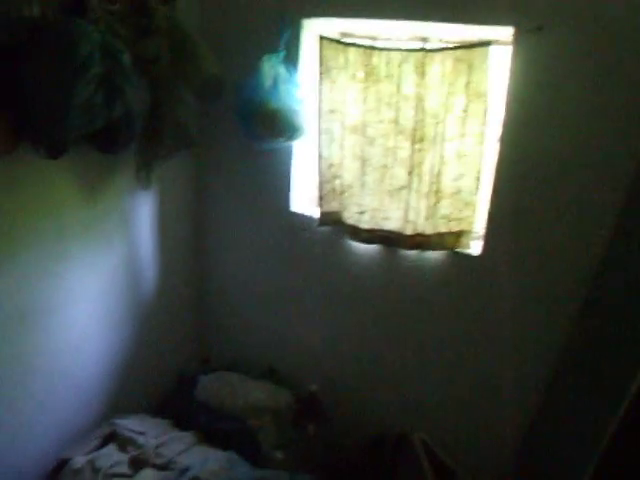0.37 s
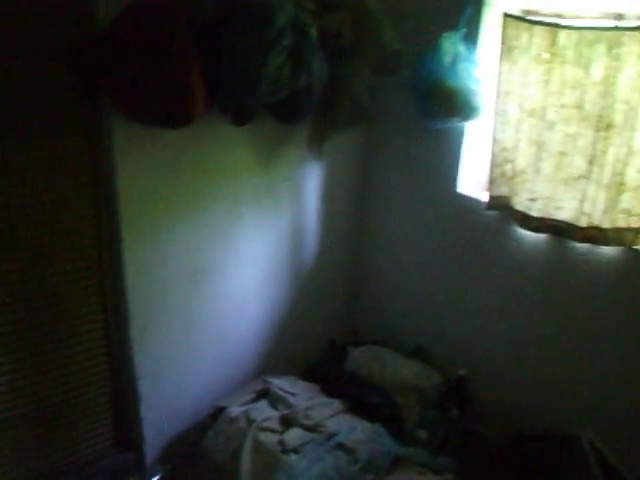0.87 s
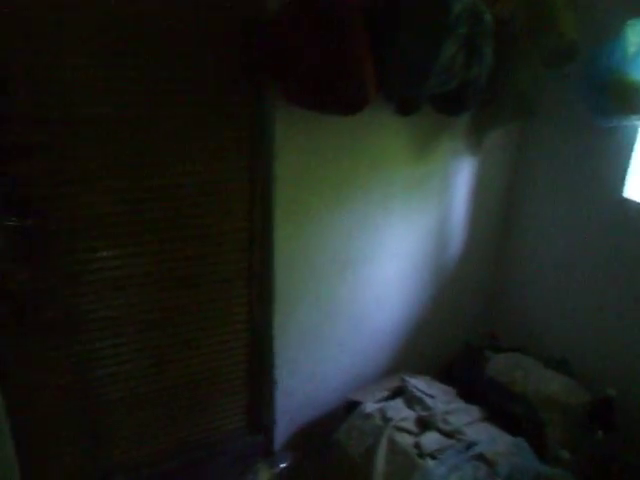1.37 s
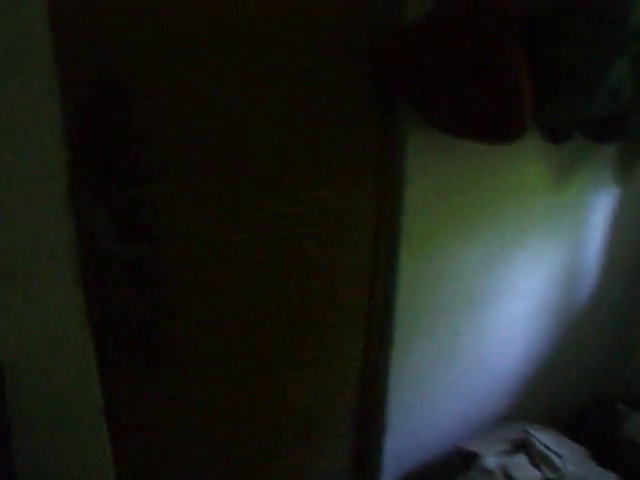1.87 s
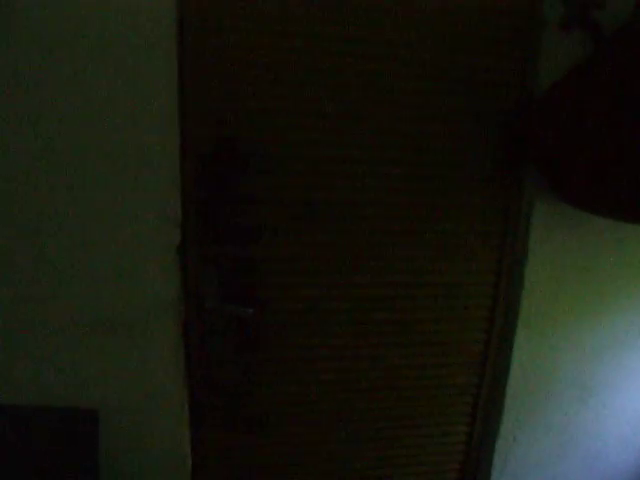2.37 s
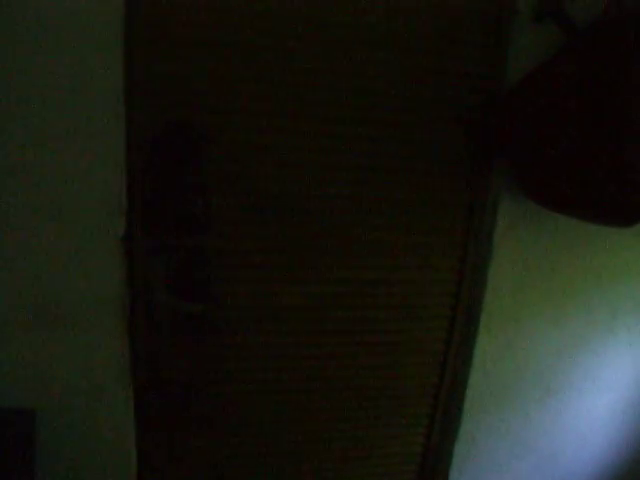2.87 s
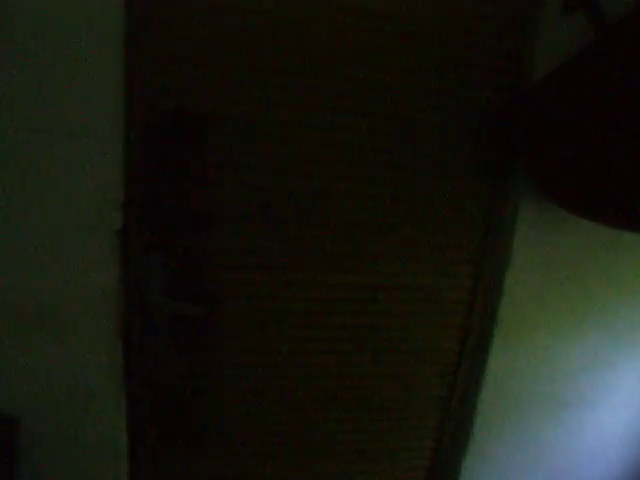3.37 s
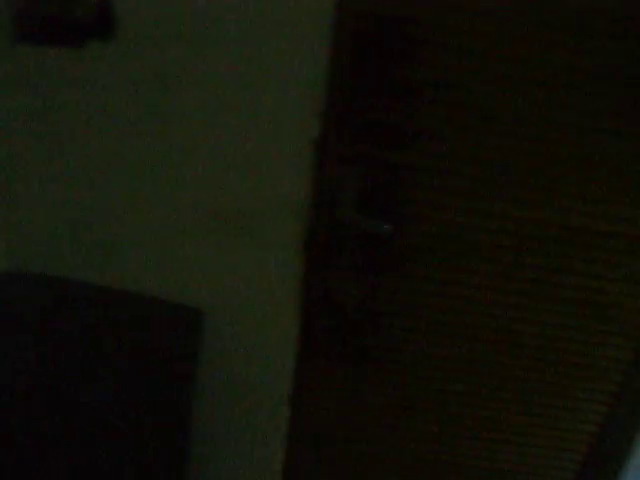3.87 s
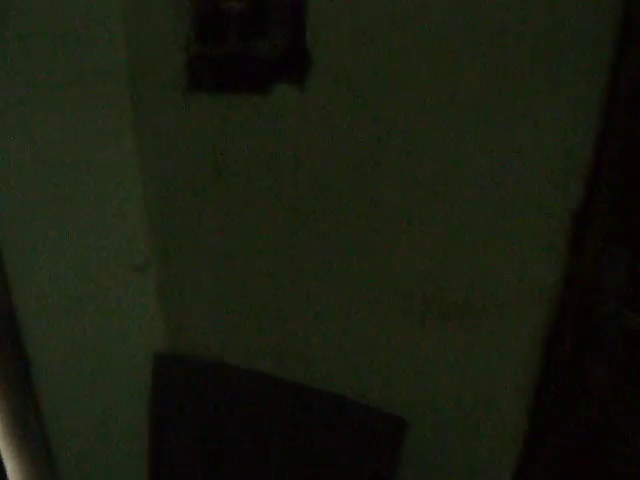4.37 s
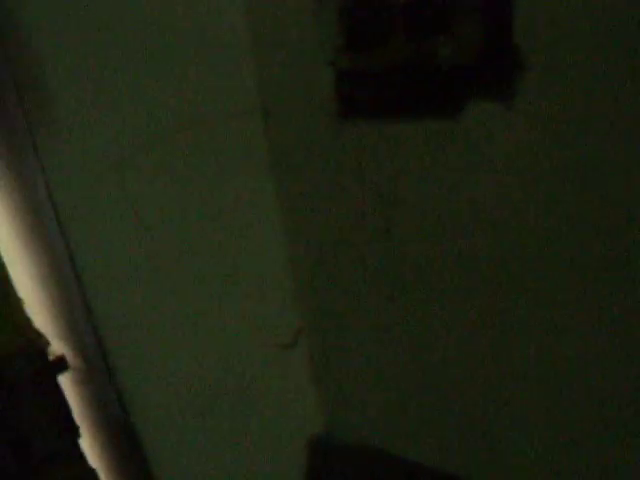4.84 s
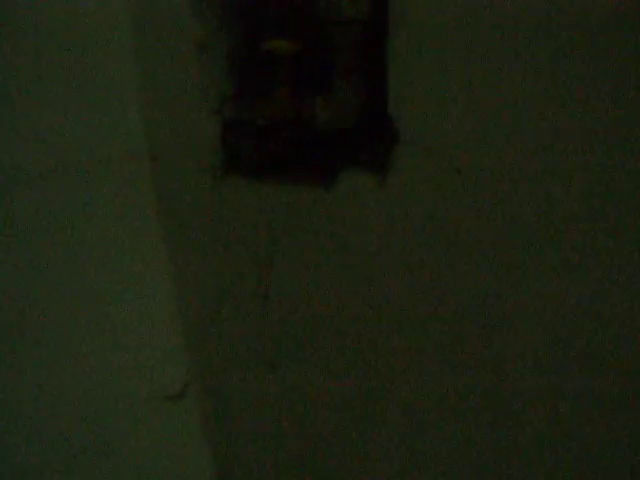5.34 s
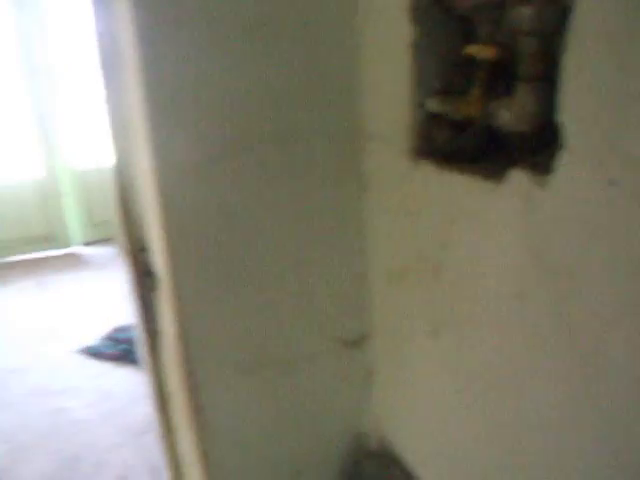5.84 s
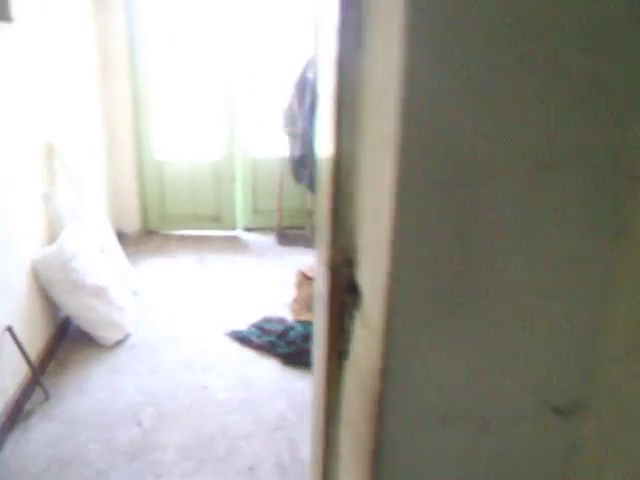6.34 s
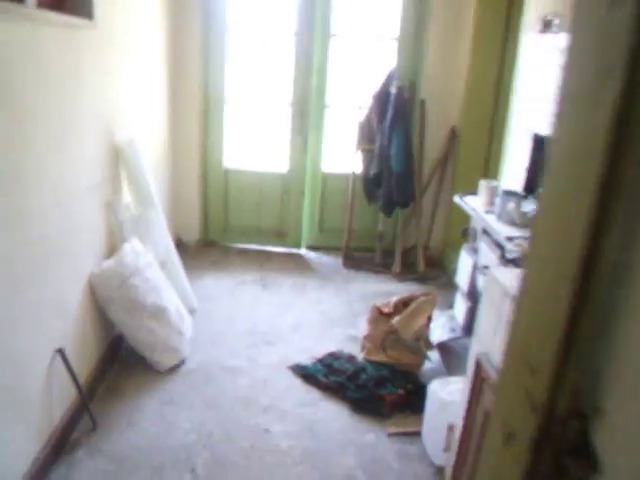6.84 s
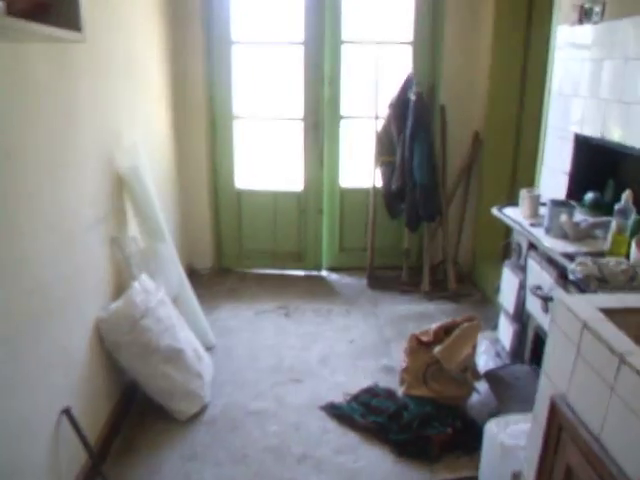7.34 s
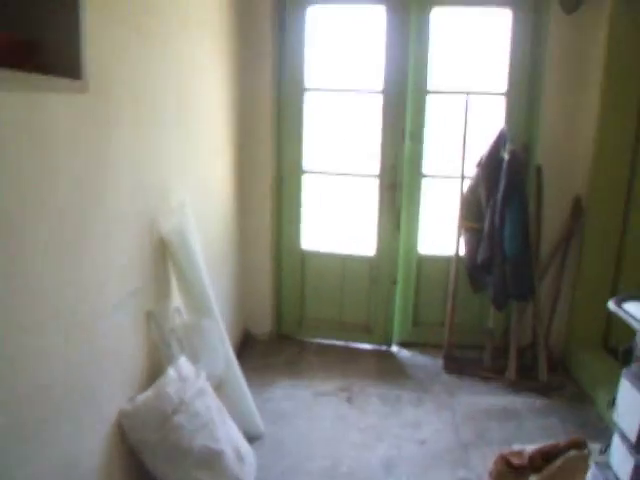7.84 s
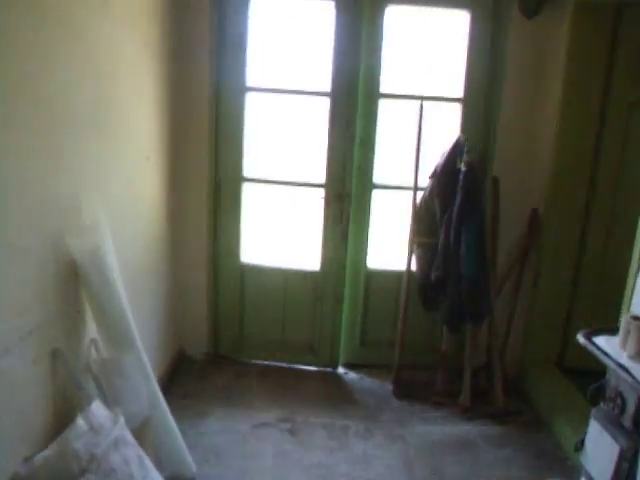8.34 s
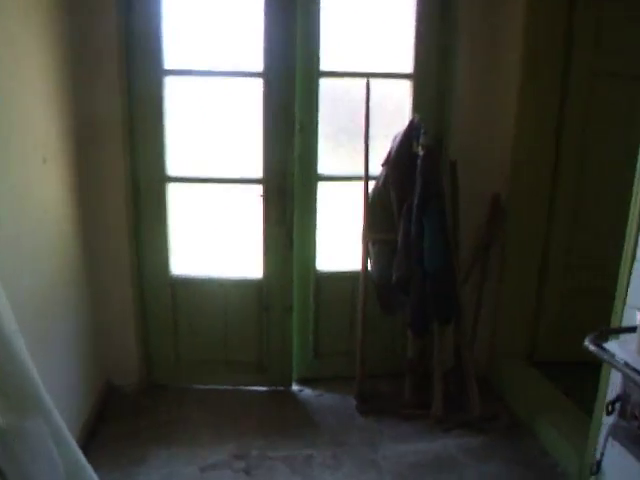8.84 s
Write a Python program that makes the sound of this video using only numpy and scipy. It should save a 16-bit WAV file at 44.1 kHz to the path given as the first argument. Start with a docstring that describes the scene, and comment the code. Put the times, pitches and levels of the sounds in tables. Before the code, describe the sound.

Plastic rubbing and a distant door bang, then a wooden door slams, booms and rattles shut, followed by sharp clicks and shoe scuffs over gritty hiss.

```python
"""Someone carries a small camera through a bare old house. At first fingers rub its plastic case and a door
hums low; a far door bangs, the case squeaks, and the iris drive starts to tick in step with the frames.
Past three seconds a wooden door slams, booms, shudders and is dragged shut, and fingers click on the case.
Shoes knock and scuff on a hard floor to the end. Rough contacts are shaped noise, clicks and slams ring as
sines, knocks are bursts of fading noise; a coarse 8-bit converter turns the quiet into a two-level hiss."""
import sys
import numpy as np
from scipy import signal
from scipy.fft import rfft, irfft
from scipy.io import wavfile

SR = 44100
rng = np.random.default_rng(int(sys.argv[2]) if len(sys.argv) > 2 else 0)


def output_pcm(signal):
    """Save a mono or channel-first signal as 16-bit PCM at the path in sys.argv[1].

    Samples are clipped to [-1, 1] before scaling.
    """
    pcm = np.clip(np.atleast_2d(signal).T, -1, 1) * 32767
    wavfile.write(sys.argv[1], SR, np.round(pcm).astype(np.int16))


def gain_from_db(level_db):
    """Convert decibel levels to linear amplitude factors (20 dB per decade)."""
    decades = np.asarray(level_db, float) / 20
    return 10 ** decades


N = 406161
RATE = 16000   # samples per second of the converter

# Resonances of the door panel. Each row: pitch in Hz, width in Hz, level in dB.
PANEL = [(138, 16, -2), (185.8, 11, -0.5), (228, 57, -11), (294, 31, -1), (323, 12, 1), (362, 19, -1.5),
         (441.5, 20, -2.5), (513, 13, -7), (582, 27, -9), (637.5, 67, -6), (782, 270, -13)]


def rms_one(x):
    """Scales a sound to an rms level of 1."""
    return x / np.sqrt(np.mean(x ** 2) + 1e-20)


def gain_curve(rows):
    """Turns rows of seconds and dB into a smooth gain, all but silent outside them."""
    s, db = np.transpose(rows)
    return gain_from_db(np.interp(np.arange(N) / SR, s, db, -110, -110))


def strokes(rows, t60s):
    """One gain per level column: every row swells, holds and dies away (60 dB in t60 s); powers add."""
    rise_share = 0.3   # a stroke swells over this share of its length
    t, power = np.arange(N) / SR, 1e-14
    for s, length, *levels_db in rows:
        rise = np.sin(np.pi / 2 * np.clip((t - s) / (rise_share * length), 0, 1)) ** 2
        fall_db = -60 * np.clip(t - s - length, 0, 3) / np.reshape(t60s, (-1, 1))
        power = power + (rise * gain_from_db(np.reshape(levels_db, (-1, 1)) + fall_db)) ** 2
    return np.sqrt(power)


def band(x, low_hz, high_hz):
    """Lets through only the sound between two pitches."""
    return signal.sosfilt(signal.butter(2, [low_hz, high_hz], "band", fs=SR, output="sos"), x)


def waver(low_hz, high_hz, depth_db):
    """A gain that wanders at random, at speeds between two rates."""
    return gain_from_db(depth_db * rms_one(band(rng.standard_normal(N), low_hz, high_hz)))


def grit(spread_db):
    """Dense contacts of uneven size: noise whose samples differ more in level as the spread grows."""
    return rng.standard_normal(N) * gain_from_db(spread_db * np.minimum(rng.exponential(1, N), 5))


def scratch(low_hz, high_hz, spread_db):
    """Grit held to one band; rms 1."""
    return rms_one(band(grit(spread_db), low_hz, high_hz))


def resonate(x, peaks):
    """Sends a sound through parallel resonances with alternating sign; rms 1."""
    out = 0
    for k, (hz, width, db) in enumerate(peaks):
        r = np.exp(-np.pi * width / SR)
        b = (1 - r * r) / 2 * np.array([1, 0, -1])
        a = [1, -2 * r * np.cos(2 * np.pi * hz / SR), r * r]
        out = out + (-1) ** k * gain_from_db(db) * signal.lfilter(b, a, x)
    return rms_one(out)


def ring(clicks, hz, t60):
    """A unit click sets a sine of about height 1 ringing; it falls by 60 dB in t60 seconds."""
    r, w = gain_from_db(-60 / (t60 * SR)), 2 * np.pi * hz / SR
    return signal.lfilter([0, np.sin(w)], [1, -2 * r * np.cos(w), r * r], clicks + 1e-18)


def sine(hz, db):
    """A tone of given rms level along a pitch track."""
    return np.sqrt(2) * gain_from_db(db) * np.sin(2 * np.pi * np.cumsum(hz * np.ones(N)) / SR)


def drag(gains, low, middle_hz, spread_db):
    """Rough sliding contact: high hiss, middle scratch and a low body, each with its own gain."""
    hiss = resonate(grit(spread_db), [(5426, 1800, -3), (6870, 1900, 0.5)])
    return gains[0] * hiss + gains[1] * scratch(*middle_hz, spread_db) + gains[2] * low


def air():
    """Steady air and microphone noise: white noise coloured by a curve and cut at half the converter rate."""
    # Colour of the noise. Each row: pitch in Hz, relative level in dB per Hz.
    colour = [(10, 9.5), (60, 5.5), (250, 6.5), (600, 5), (1500, 1.5), (4000, -1.5), (8000, 0)]
    level_db = -56
    hz, db = np.transpose(colour)
    pitches = np.fft.rfftfreq(N, 1 / SR) + 1
    shape = gain_from_db(np.interp(np.log(pitches), np.log(hz), db)) * (pitches < RATE / 2)
    return gain_from_db(level_db) * rms_one(irfft(rfft(rng.standard_normal(N)) * shape, N))


def iris():
    """Soft steps of the iris drive, a few milliseconds long, ring its modes while the gears chatter."""
    # Bursts of steps. Each row: first step in seconds, number of steps, frames apart, level in dB.
    bursts = [(1.216, 7, 1, -35), (1.482, 2, 3, -38.5), (1.947, 2, 4, -33), (2.181, 2, 4, -32.5),
              (2.414, 6, 3, -34.5), (3.116, 1, 1, -35.5), (5.185, 1, 1, -40), (6.183, 1, 1, -34.5),
              (6.2165, 43, 2, -41), (6.25, 42, 2, -38)]
    # Modes of the drive. Each row: pitch in Hz, level in dB, seconds to fall by 60 dB.
    modes = [(627.7, -5, .025), (4690, -5, .012), (3000, -12.5, 0.007), (6820, -6, 0.0027)]
    frame_hz, spread_db, step_s = 30, 1.4, 0.0054
    chatter_hz = 2500   # above this the gear noise outweighs the step
    times, levels_db = [], []
    for first_s, count, apart, db in bursts:
        for k in range(round(count)):
            times.append(first_s + k * apart / frame_hz)
            levels_db.append(db)
    steps = np.zeros(N)
    at = (np.array(times) * SR).astype(int)
    steps[at] = gain_from_db(np.array(levels_db) + rng.normal(0, spread_db, len(at)))
    swell = signal.windows.hann(int(step_s * SR))
    t = np.arange(len(swell)) / SR
    out = 0
    for hz, mode_db, t60 in modes:
        push = swell * np.sin(2 * np.pi * hz * t)
        drive = np.convolve(steps, push, "same") * 4 / len(swell)
        chatter = 1 + hz / chatter_hz * rng.standard_normal(N)
        out = out + gain_from_db(mode_db) * ring(drive * chatter, hz, t60)
    return out


def shoes():
    """Shoes dragged over grit: noisy strokes of hiss, middle scratch and low scrape."""
    # Each row: start in seconds, length in seconds, hiss in dB, middle in dB, low in dB.
    scuffs = [(1.88, 0.051, -52.5, -52, -57.5), (2.905, 0.025, -37.5, -40.5, -61),
              (2.975, 0.042, -36.5, -40.5, -54.5), (5.5, 0.029, -46, -61, -61.5),
              (5.59, 0.03, -51, -58, -56), (5.69, .05, -48.5, -52.5, -63),
              (5.78, 0.021, -45.5, -52.5, -52.5), (6.37, 0.093, -45, -50.5, -55.5),
              (6.55, 0.025, -53, -56.5, -56), (6.77, 0.049, -49.5, -52.5, -57.5),
              (7.49, 0.037, -52.5, -56, -57.5), (7.57, 0.068, -50, -50, -57.5),
              (7.64, 0.066, -43, -50.5, -55), (7.83, 0.025, -48.5, -51.5, -57.5),
              (8.313, 0.024, -37, -48.5, -50.5), (8.35, 0.018, -37, -45, -53),
              (8.48, 0.15, -52, -56, -58.5), (8.63, .15, -47, -52, -68.5), (8.84, 0.094, -56, -56.5, -54.5),
              (9.072, 0.069, -31.5, -36.5, -36), (9.125, 0.037, -28, -35.5, -36.5)]
    gains = strokes(scuffs, (0.3, 0.37, 0.3))   # seconds to fall by 60 dB: hiss, middle, low
    return drag(gains, scratch(450, 1100, spread_db=-1.5), (1500, 4500), spread_db=3.0)


def knocks(rows, t60, front_db):
    """A sharp front of direct sound, then dense reflections that die away: bass, body and treble."""
    rise_s, front_t60_s = 0.0008, 0.022
    body_span = 1.55   # the body reaches this factor below and above its pitch
    out, echoes = np.zeros(N), grit(2.5)
    low, high = scratch(220, 900, spread_db=0.5), scratch(3200, 10000, spread_db=0.0)
    for s, db, bass_db, treble_db, body_hz in rows:
        part = slice(int(s * SR), int(s * SR) + SR // 2)
        t = np.arange(len(out[part])) / SR
        front = gain_from_db(front_db - 60 * t / front_t60_s)
        fade = (1 - np.exp(-t / rise_s)) * (gain_from_db(-60 * t / t60) + front)
        body = rms_one(band(echoes[part], body_hz / body_span, body_hz * body_span))
        out[part] += fade * (gain_from_db(bass_db) * low[part] + gain_from_db(db) * body + gain_from_db(treble_db) * high[part])
    return band(out, 170, 12000)


def hits():
    """Noise bursts for hard blows: a longer fade for a far bang and room knocks, a short one for dry hits."""
    # Each row of these three: start in seconds, body in dB, bass in dB, treble in dB, body pitch in Hz.
    far_bang = [(0.762, -21, -25.5, -18.5, 2380)]      # a far door bangs
    door_heels = [(1.798, -55.5, -54, -60, 1030), (2.904, -46.5, -53, -43.5, 2500),
                  (3.001, -50.5, -48.5, -43.5, 1380), (3.585, -34, -54, -36.5, 2710),
                  (5.437, -40, -49.5, -54.5, 1150), (5.509, -51, -73, -51, 2430),
                  (5.68, -52, -62, -40.5, 3000), (6.513, -38.5, -51.5, -41.5, 1450),
                  (7.386, -44.5, -52.5, -45, 3000), (7.618, -42, -47.5, -42.5, 990),
                  (7.628, -40.5, -54.5, -35.5, 2480), (7.986, -45, -44.5, -59, 3600),
                  (8.475, -54, -61, -47.5, 3000), (8.546, -49, -42, -53, 660),
                  (8.819, -48, -45.5, -64, 3390), (9.078, -43, -48, -57, 300)]  # door and heels, heard through the room
    dry_hits = [(3.173, -18, -27, -34, 1500), (5.0716, -26, -41.5, -26, 1900)]      # short dry raps close by: the latch as the door slams, and a handle
    return (knocks(far_bang, t60=0.49, front_db=-3) + knocks(door_heels, t60=0.36, front_db=4.5)
            + knocks(dry_hits, t60=0.05, front_db=0.5))


def room(x):
    """Bare walls: reflections as noise that dies away."""
    t60_s, level_db = 0.47, -13.5
    t = np.arange(SR // 2) / SR
    tail = rng.standard_normal(len(t)) * gain_from_db(-60 * t / t60_s) * (t > 0.004)
    tail = tail / np.sqrt(np.sum(tail ** 2))
    return gain_from_db(level_db) * signal.fftconvolve(band(x, 300, 4000), tail)[:N]


def thumps():
    """A finger pad lands dully on the case: a short low ring with no crack."""
    # Each row: start in seconds, level in dB.
    landings = [(4.704, -25.5), (4.79, -24.5)]
    s, db = np.transpose(landings)
    blows = np.zeros(N)
    blows[(s * SR).astype(int)] = gain_from_db(db)
    return ring(blows, hz=267, t60=0.015)


def case():
    """Each click strikes all modes of the case, tilted by where the finger lands, with a brief dry crack."""
    # Each row: start in seconds, level in dB, bass tilt in dB, treble tilt in dB, crack in dB.
    click_rows = [(1.716, -15.5, -4, -29, -26), (1.728, -28.5, 5, -15, -35), (4.365, -58, 10, 21, -70),
                  (4.403, -55, 9, 22.5, -59), (4.44, -16.5, 7.5, 1.5, -14.5), (4.48, -32.5, 2, -12, -49),
                  (4.583, -18, 7, 1.5, -17), (4.594, -24.5, -7, -10, -37), (4.655, -30.5, 0, 2.5, -29),
                  (4.66, -19.5, 1.5, -6.5, -20), (4.673, -32.5, 5, -21, -44),
                  (4.705, -43.5, 17.5, -11, -35), (4.752, -53, -2, 18, -37), (4.789, -51.5, 21, 14, -53),
                  (4.828, -32, -18, 1, -43.5), (4.841, -41.5, 5, -3, -47), (8.357, -44.5, -2, 23.5, -49),
                  (8.366, -56, -20, 16, -68), (8.39, -41.5, -27, 23.5, -29)]
    # Modes of the case. Each row: pitch in Hz, level in dB, seconds to fall by 60 dB.
    modes = [(300, -17.5, 0.012), (538, -3.5, 0.012), (743, -3, 0.018), (1121, -0.5, 0.031),
             (1450, -11.5, 0.017), (2100, -3.5, 0.021), (3020, -11, 0.013), (3600, -10.5, 0.0097),
             (4140, -2.5, 0.012), (5080, -4, 0.0049), (6100, -3, 0.02), (6440, -8, 0.014),
             (7000, 6.5, 0.011), (7400, 3, 0.01)]
    luck_db, crack_t60_s = 2.1, 0.033
    s, db, bass_db, treble_db, crack_db = np.transpose(click_rows)
    at, out = (s * SR).astype(int), np.zeros(N)
    luck = rng.normal(0, luck_db, (len(s), len(modes)))
    for k, (hz, mode_db, t60) in enumerate(modes):
        clicks = np.zeros(N)
        tilt_db = bass_db * (hz < 850) + treble_db * np.clip(np.log2(hz / 2200), 0, 1)
        clicks[at] = (-1) ** (k + 1) * gain_from_db(db + mode_db + tilt_db + luck[:, k])
        out += ring(clicks, hz, t60)
    crack = np.zeros(N)
    crack[at] = gain_from_db(crack_db)
    crack_fade = signal.lfilter([1], [1, -gain_from_db(-60 / (crack_t60_s * SR))], crack)
    return band(out, 100, 8400) + band(crack_fade * rng.standard_normal(N), 1100, 8200)


def squeak():
    """A slip locks into a short tone with its octave; its pitch sags and both pitch and grip are unsteady."""
    # Each row: start in seconds, length in seconds, level in dB.
    slips = [(1.03, .06, -53.5), (1.075, .05, -47.5)]
    start_hz, sag_hz_per_s, waver_hz = 2190, 470, 30
    t = np.arange(N) / SR
    wander = waver_hz * rms_one(band(rng.standard_normal(N), 30, 370))
    hz = start_hz - sag_hz_per_s * (t - slips[0][0]).clip(0, 1) + wander
    grip = 1 + 0.6 * scratch(50, 200, spread_db=3.5)
    return strokes(slips, 0.5)[0] * grip * (sine(hz, 0) + sine(2 * hz, -10))


def fingers():
    """Skin slips on plastic and excites the case: gritty noise through its resonances."""
    # Pressure of the fingers until the first knock. Each row: time in seconds, level in dB.
    press = [(0.0, -39.5), (0.052, -43), (0.126, -41), (0.34, -44.5), (0.42, -40), (0.678, -44),
             (0.736, -50), (0.755, -33)]
    # Resonances of the rubbed case. Each row: pitch in Hz, width in Hz, level in dB.
    peaks = [(890, 390, -7.5), (1137, 62, 2), (2060, 150, -12), (2930, 130, -3), (3790, 200, -1),
             (4510, 340, -8.5), (5660, 1000, -12.5)]
    # The grip tightens. Each row: start in seconds, length in seconds, level in dB.
    squeezes = [(.06, 0.083, -27.5), (.245, 0.019, -40)]
    body_db, low_db, hiss_db = -7, -2, -12.5   # against the pressure
    pressure = gain_curve(press)
    body = gain_from_db(body_db) * pressure + strokes(squeezes, 0.13)[0]
    rub = body * resonate(grit(3.0), peaks[:3]) + pressure * resonate(grit(5.9), peaks[3:])
    low_scratch = gain_from_db(low_db) * pressure * scratch(380, 1800, spread_db=3.5)
    skin_hiss = gain_from_db(hiss_db) * pressure * scratch(5000, 9000, spread_db=1.5)
    return rub + low_scratch + skin_hiss


def swing():
    """The swinging door hums low through narrow resonances, and air rumbles as the leaf sweeps round."""
    # Loudness of the hum. Each row: time in seconds, level in dB.
    hum = [(0.0, -50), (0.09, -50), (0.73, -44.5), (0.77, -33.5), (0.91, -38.5), (1.0, -50.5),
           (1.21, -55.5), (1.46, -74), (1.66, -66.5), (1.8, -47), (1.96, -66), (2.4, -62.5)]
    # Resonances of the hum. Each row: pitch in Hz, width in Hz, level in dB.
    peaks = [(151, 13, -12.5), (267.5, 6.5, 0.5), (349, 9.8, 2), (319.6, 33, -13.5), (588.5, 41, -6)]
    # Sweeps of the leaf. Each row: start in seconds, length in seconds, level in dB.
    sweeps = [(0, 0.64, -63.5), (.6, 0.64, -58), (1.72, .25, -63.5)]
    rumble = strokes(sweeps, 0.8)[0] * scratch(20, 55, spread_db=4)
    return gain_curve(hum) * resonate(grit(2.5), peaks) + rumble


def push():
    """A slow swell of air pressure as the next door opens: a few waves too low to hear as a tone."""
    middle_s, hz, level_db = 5.385, 5, -53
    t = np.arange(N) / SR - middle_s
    return gain_from_db(level_db) * np.cos(2 * np.pi * hz * t) * np.exp(-(t * hz) ** 2)


def booms():
    """Door shocks: a room boom sinking in pitch, a steady upper boom, and a low wobble of the leaf."""
    # Each row: start in seconds, length in seconds, boom in dB, upper boom in dB, wobble in dB.
    shocks = [(3.168, 0.052, -32, -33, -22), (3.23, 0.18, -31, -37.5, -27.5), (3.62, 0.25, -44, -57, -43.5),
              (3.84, .11, -48, -51, -26), (3.96, 0.17, -34.5, -38.5, -39.5), (4.22, 0.1, -41, -49, -49)]
    # The boom lingers. Each row: start in seconds, length in seconds, level in dB.
    lingering = [(4.35, 0.18, -48)]
    boom_hz, sag_hz_per_s, upper_hz, wobble_hz = 80.3, 2.3, 108.9, 15.8
    octave_db, rumble_db = -2.5, -14   # against the wobble
    t = np.arange(N) / SR
    boom, upper, wobble = strokes(shocks, (0.53, 0.61, 0.41))   # seconds to fall by 60 dB
    boom = np.hypot(boom, strokes(lingering, 1.9)[0])
    sinking_hz = boom_hz - sag_hz_per_s * (t - shocks[0][0])
    out = boom * sine(sinking_hz, 0) * waver(2.5, 13, depth_db=1)
    out += upper * sine(upper_hz, 0) * waver(2.7, 12, depth_db=1)
    octave = sine(2 * wobble_hz, octave_db) * waver(3.0, 8, depth_db=3.5)
    out += wobble * (sine(wobble_hz, 0) + octave)
    # the wobbling leaf rumbles in its frame
    out += wobble * gain_from_db(rumble_db) * scratch(48, 140, spread_db=-0.5)
    return out


def rattle():
    """The door rattles and drags in its frame: rough contact that also excites the panel resonances."""
    # Each row: start in seconds, length in seconds, hiss in dB, middle in dB, panel in dB.
    jolts = [(3.173, 0.012, -27.5, -20, -21.5), (3.235, 0.052, -29.5, -24.5, -27),
             (3.33, 0.058, -61, -31, -30), (3.585, 0.025, -38.5, -41.5, -40),
             (3.74, 0.093, -58.5, -56, -51), (3.82, .015, -33.5, -36.5, -39.5),
             (3.83, 0.046, -39.5, -28, -32.5), (3.9, 0.052, -31, -25.5, -31.5),
             (3.99, 0.043, -39, -23.5, -29.5), (4.16, 0.088, -42, -47.5, -49.5),
             (4.395, 0.018, -42, -45, -64), (4.47, 0.13, -50, -50, -54.5), (4.595, 0.01, -51, -42.5, -46),
             (4.775, 0.016, -47, -53.5, -56), (4.82, 0.0068, -45.5, -52, -54.5)]
    gains = strokes(jolts, (0.22, 0.39, 0.7))   # seconds to fall by 60 dB: hiss, middle, panel
    return drag(gains, resonate(grit(3.1), PANEL), (900, 4200), spread_db=2.5)


def slams():
    """The leaf meets the frame: each panel resonance rings, a narrow one for long, over a dull thud."""
    # Each row: start in seconds, level in dB, dull thud in dB.
    blow_rows = [(3.1745, -27, -9), (3.243, -29, -21), (3.84, -33, -22), (3.915, -32, -26)]
    s, db, thud_db = np.transpose(blow_rows)
    at, thuds = (s * SR).astype(int), np.zeros(N)
    luck = rng.normal(0, 0.67, (len(s), len(PANEL)))   # uneven blows, in dB
    thuds[at] = gain_from_db(thud_db)
    out = ring(thuds, hz=278, t60=0.08)
    for k, (hz, width, mode_db) in enumerate(PANEL):
        blows = np.zeros(N)
        blows[at] = gain_from_db(db + mode_db + luck[:, k])
        out += ring(blows, hz, np.log(1000) / (np.pi * width))
    return band(out, 220, 1900)


def scene():
    """Adds up all the sources; only the clicks of the case are sent through the room reflections."""
    clicks = case()
    background = air() + iris() + shoes() + hits()
    hands = clicks + room(clicks) + thumps() + squeak() + fingers()
    door = swing() + push() + booms() + rattle() + slams()
    return (background + hands + door)[None]


def top_cut(x):
    """Nothing passes above the cut-off."""
    return signal.sosfilt(signal.butter(12, 9300, fs=SR, output="sos"), x)


def record(dry):
    """Sampled at a low rate, cut down to 8 bits, then brought back up by a short filter."""
    step, offset = 2 ** -7.5, 0.00037   # converter step and zero error, as sample values
    up, down = SR // 100, RATE // 100
    guard = signal.firwin(64 * up + 1, 1.05 / up, window=("kaiser", 6))
    coarse = signal.resample_poly(dry, down, up, axis=1, window=guard)
    # rounding down makes quiet noise flip between two levels
    coarse = step * np.clip(np.floor((coarse + offset) / step), -128, 127)
    smooth = signal.firwin(32 * up + 1, 0.99 / up, window=("kaiser", 9))
    mix = signal.resample_poly(coarse, up, down, axis=1, window=smooth)[:, :N]
    return top_cut(mix)


dry = scene()
out = record(dry)
output_pcm(out)
```